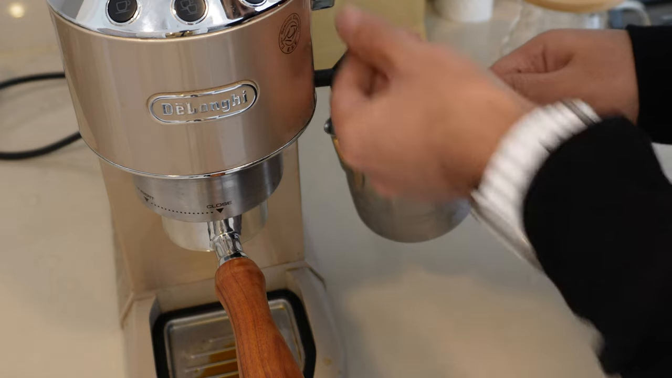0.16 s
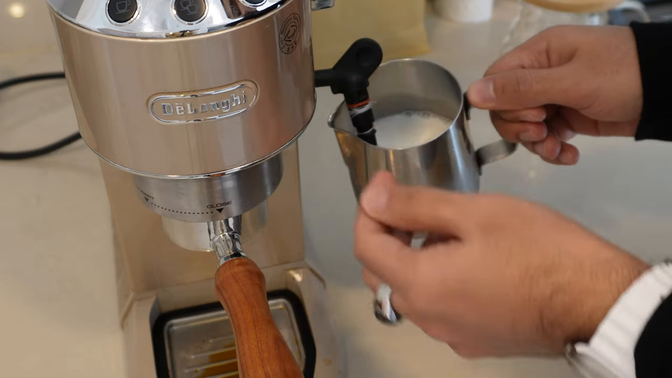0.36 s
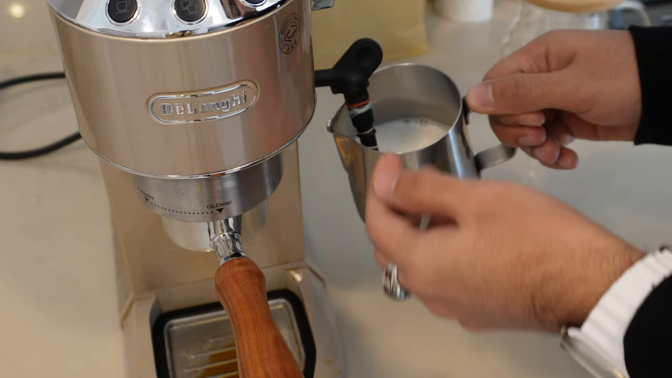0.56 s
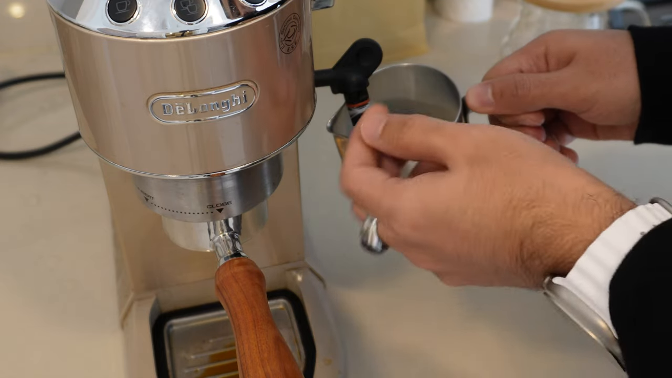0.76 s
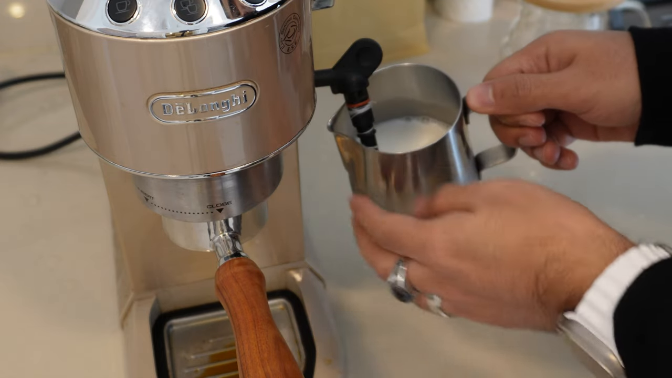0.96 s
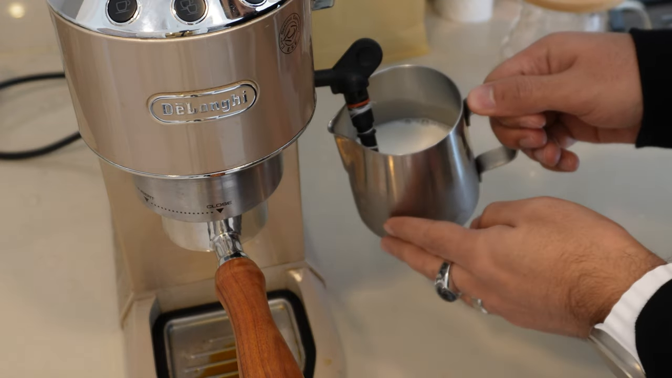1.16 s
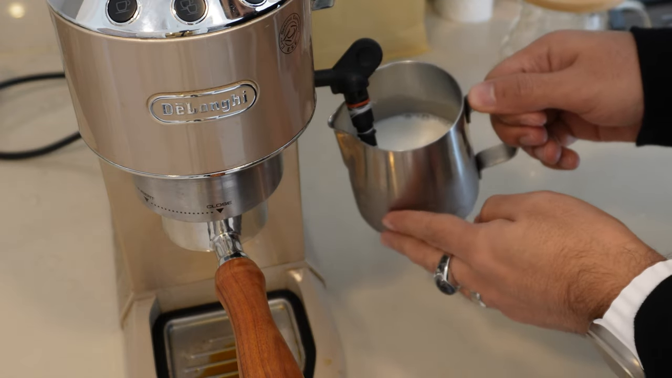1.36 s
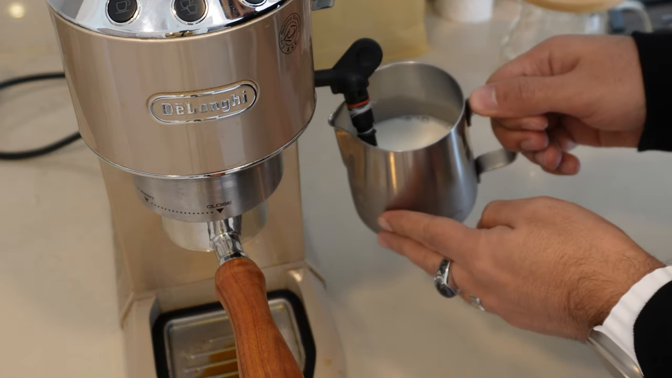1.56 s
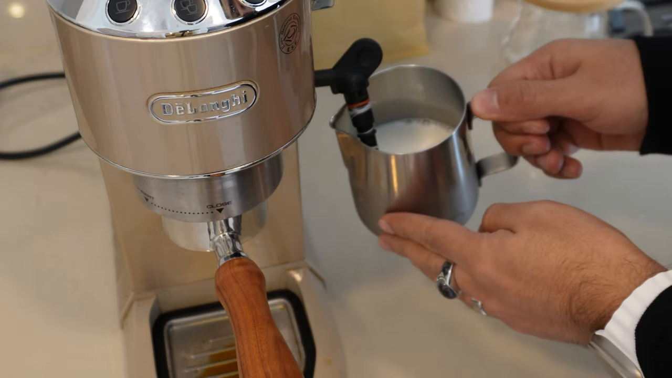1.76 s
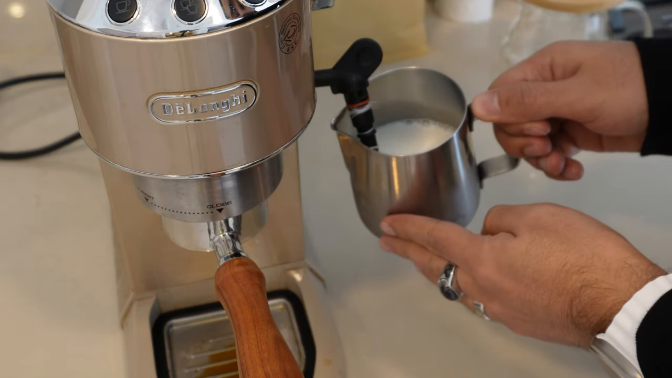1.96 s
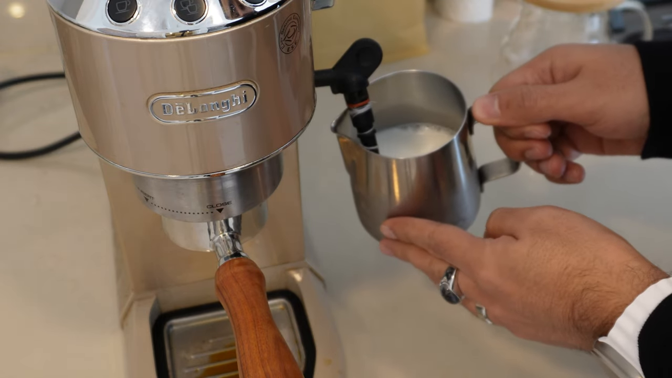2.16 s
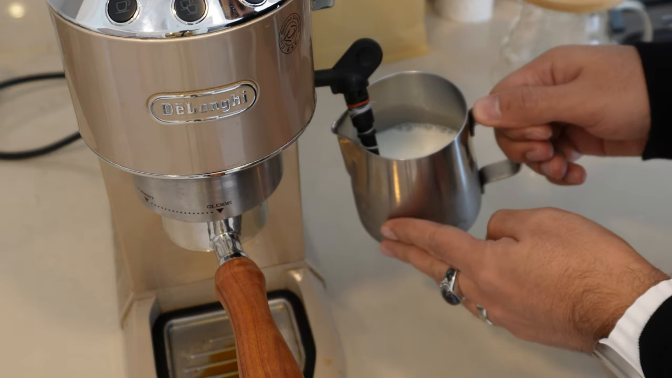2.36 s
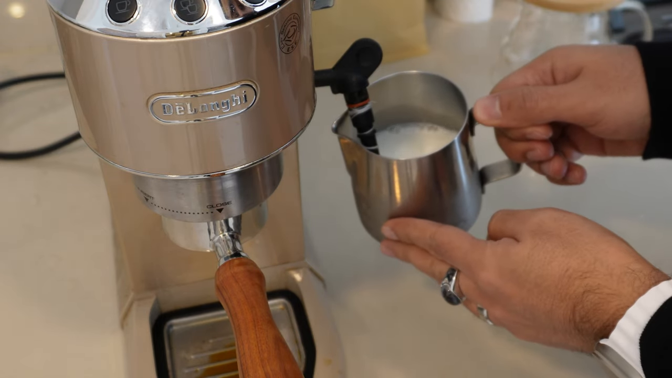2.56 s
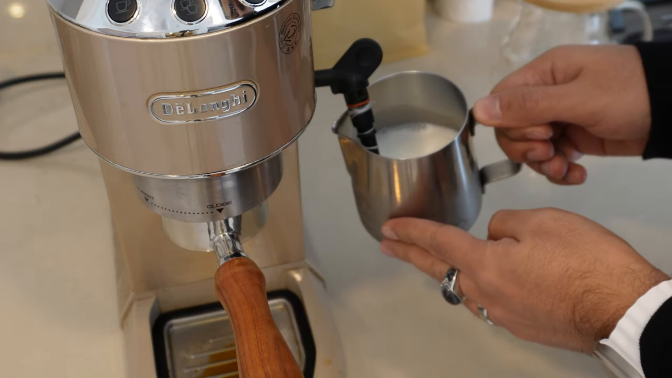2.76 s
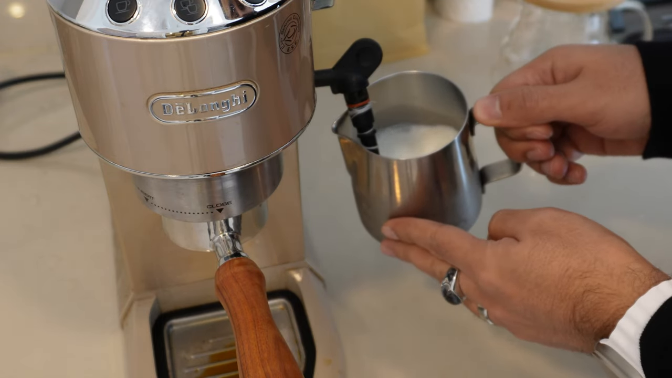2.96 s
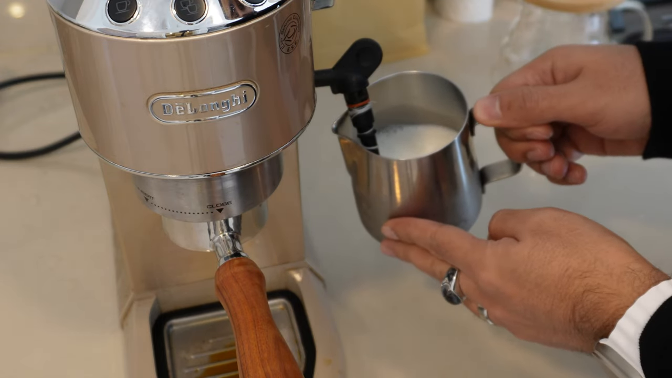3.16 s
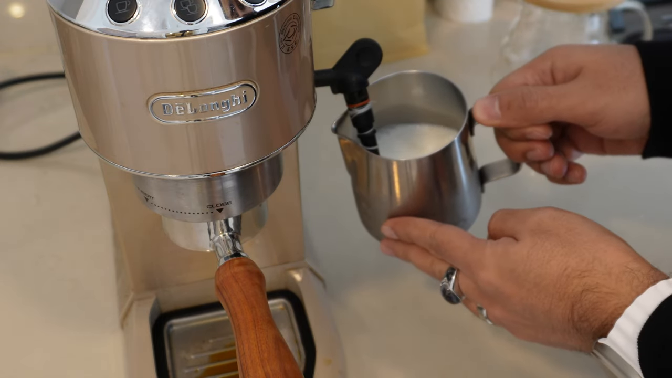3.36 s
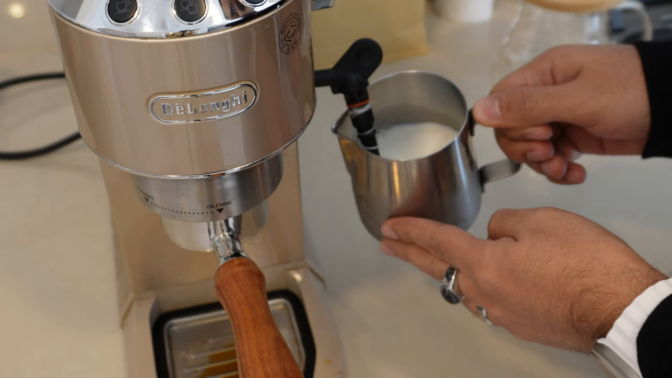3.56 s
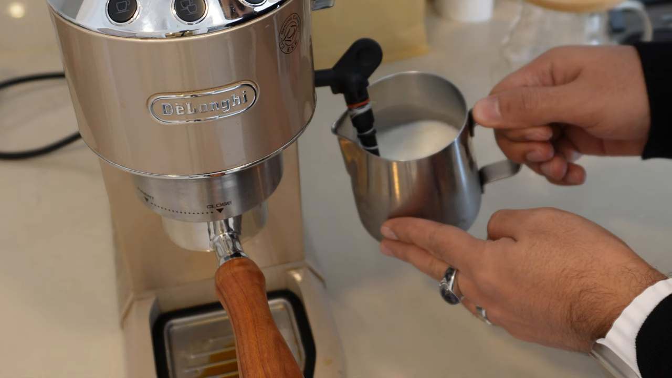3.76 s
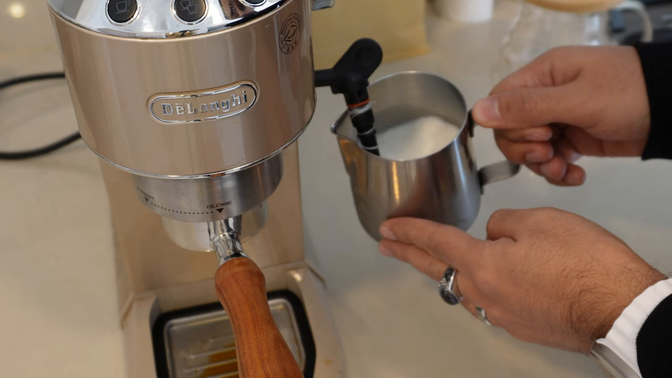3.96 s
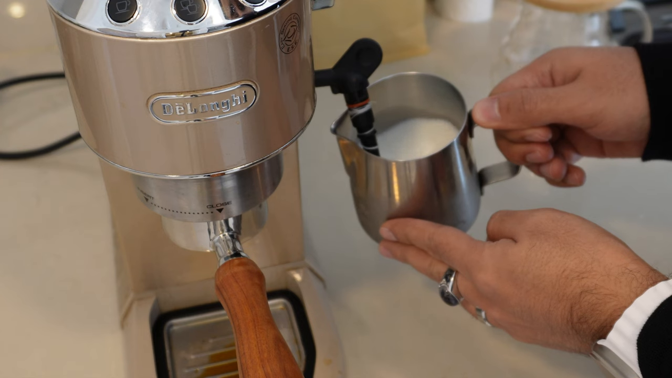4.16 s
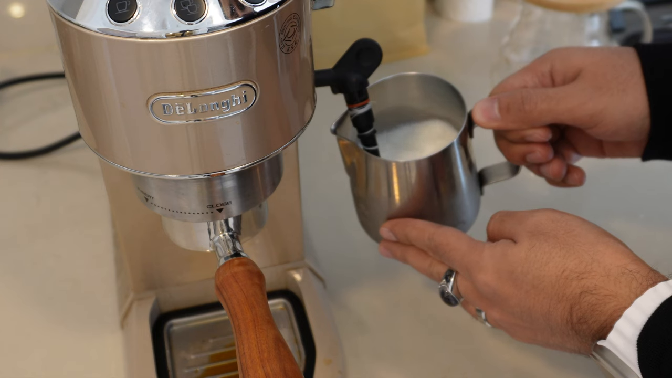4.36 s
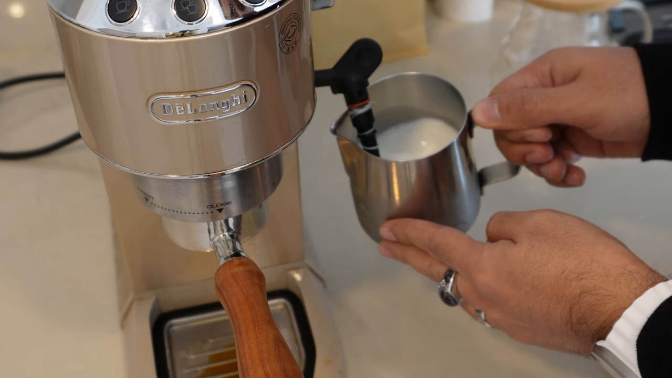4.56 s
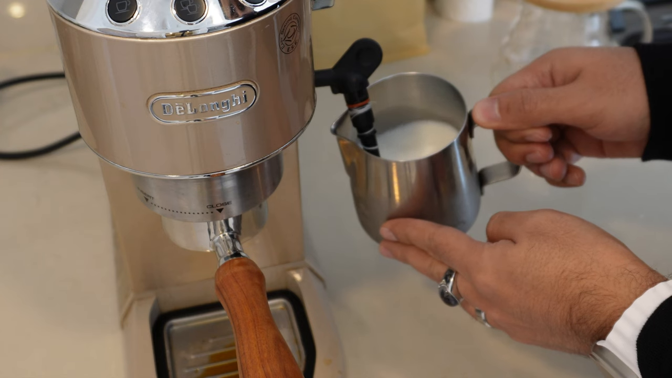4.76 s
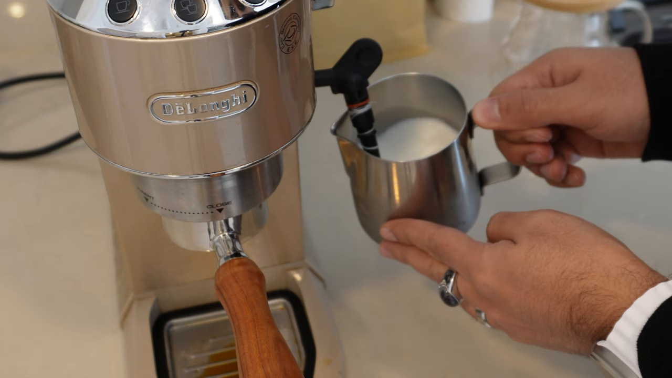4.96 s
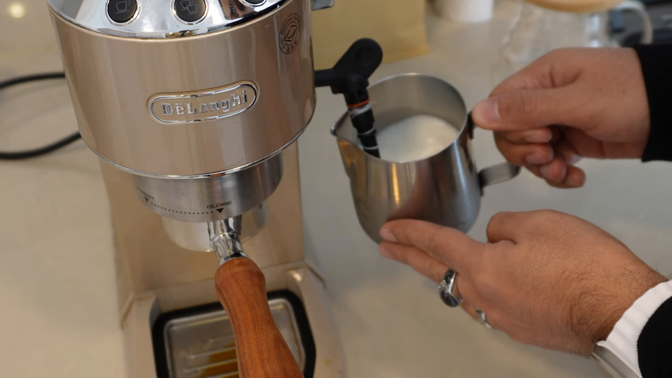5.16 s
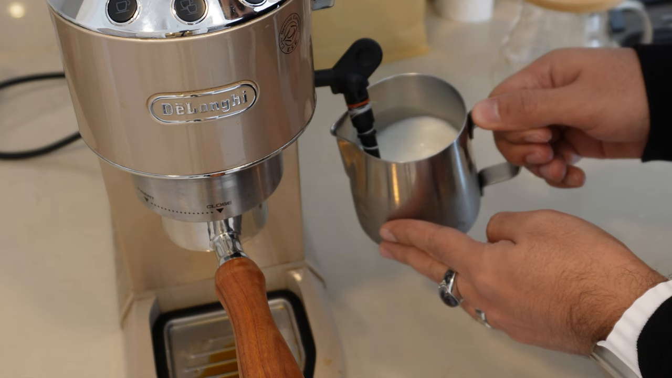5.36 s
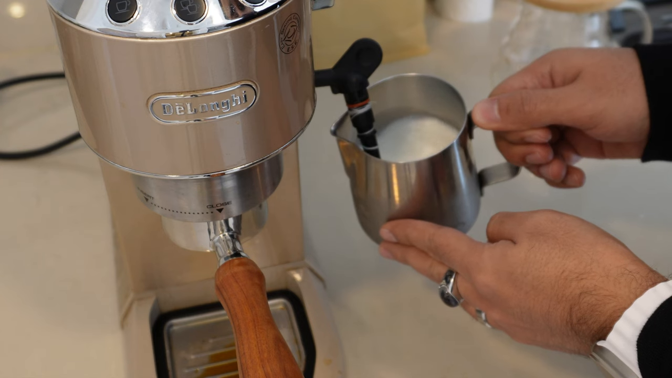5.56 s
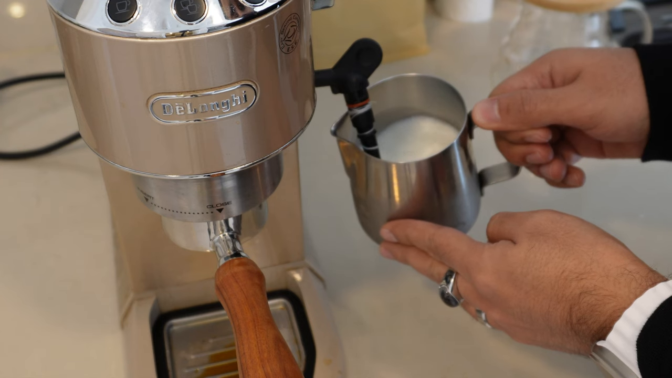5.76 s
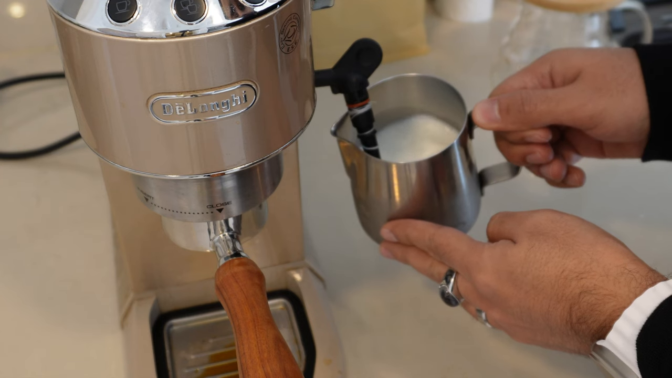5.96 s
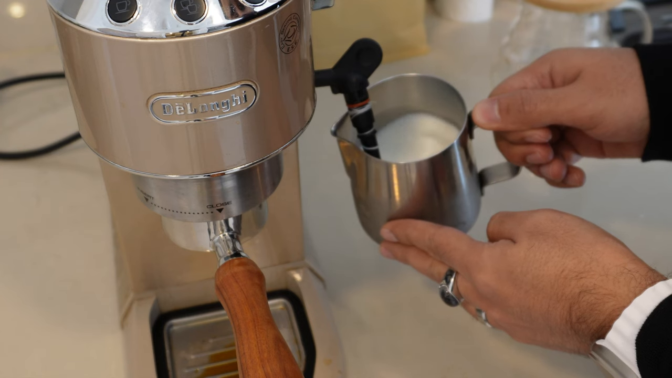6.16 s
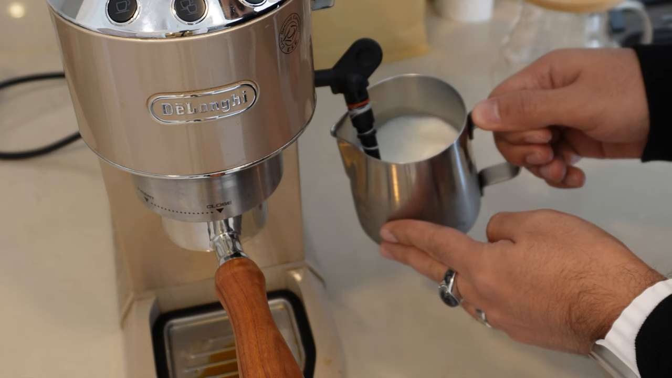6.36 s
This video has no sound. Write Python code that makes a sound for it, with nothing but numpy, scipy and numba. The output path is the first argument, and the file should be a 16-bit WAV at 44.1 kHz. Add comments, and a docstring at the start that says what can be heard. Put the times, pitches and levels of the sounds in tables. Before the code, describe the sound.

At the very start a coffee machine knob clicks with a sharp metallic clink, and a steel pitcher taps lightly against the steam wand twice within the first half second. A faint kitchen rumble and hum fill the short pause. At about 1 second the wand spits several crackling spurts of water, and steam enters the milk with a rising gurgle. From 1.2 seconds a loud, fizzing hiss runs on, with a metallic colour from the pitcher and a wavering high tone; higher gurgles rise through it until about 2.3 seconds. From around 4 seconds the tone sharpens into repeated short squeals, and a thin whistle joins at about 5.3 seconds. Underneath, the pump gives a soft, brief buzz once a second, like a regular tick. The steaming continues to the end at about 6.4 seconds, close to the microphone with slight room reverberation.

```python
"""Frothing milk with a steam wand

A steel pitcher on a kitchen counter, close to a mono microphone. The knob clicks, the pitcher taps the
wand, and steam spurts in with a rising gurgle. Collapsing steam bubbles excite the modes of the pitcher
wall and the froth, while the steam pocket at the tip resonates and squeals. The pump buzzes each second."""
import sys
import numpy as np
from scipy import signal
from scipy.fft import rfft, irfft
from scipy.io import wavfile
from scipy.ndimage import uniform_filter1d, minimum_filter1d
from numba import njit

SR = 44100
rng = np.random.default_rng(int(sys.argv[2]) if len(sys.argv) > 2 else 0)


def dump(signal):
    """Clip the signal to [-1, 1] and save it as 16-bit WAV at the path in sys.argv[1]."""
    limited = np.clip(np.atleast_2d(signal).T, -1, 1)
    pcm = np.round(limited * 32767).astype(np.int16)
    wavfile.write(sys.argv[1], SR, pcm)


N = 283563
TIME = np.arange(N) / SR
MAINS_HZ = 50.23


def undb(db):
    """Amplitude ratio of a level in dB."""
    return 10 ** (np.asarray(db) / 20)


def unit(x):
    """Normalisation to an rms of 1."""
    return x / np.sqrt(np.mean(np.abs(x) ** 2))


def curves(table):
    """Linear interpolation in time: a gate that opens at the first row, then each column."""
    times, *columns = np.transpose(table)
    return [TIME >= times[0]] + [np.interp(TIME, times, column) for column in columns]


def hump(start, length, edge):
    """Squared trapezoidal envelope that rises and falls over edge seconds."""
    return np.clip(np.minimum(TIME - start, start + length - TIME) / edge + .5, 0, 1) ** 2


def walk(rate):
    """Random modulation: values held for 1 / rate seconds and smoothed twice; spread near 1."""
    hold = int(SR / rate)
    steps = np.repeat(rng.standard_normal(N // hold + 1), hold)
    return 1.34 * uniform_filter1d(uniform_filter1d(steps, hold), hold)[:N]


@njit
def one_pole(x, pole):
    """First-order complex recursion whose pole may move every sample."""
    z, out = 0j, np.empty(len(x), np.complex128)
    for i in range(len(x)):
        z = z * pole[i] + x[i]
        out[i] = z
    return out


def ring(x, hz, *widths):
    """Damped resonators in cascade at hz, one per bandwidth in Hz; complex, unit gain at the centre."""
    for width in widths:
        damping = np.pi * width / SR
        x = damping * one_pole(x + 0j, np.exp(2j * np.pi * hz / SR - damping) * np.ones(N))
    return x


def kitchen(rumble_db=-50.5, hum_db=-58):
    """Background noise: broadband room rumble and a wavering hum at twice the mains frequency."""
    # rumble spectrum: f/Hz, relative spectral density level/dB
    spectrum = [(20, -22), (40, -14.5), (70, -15.5), (130, -6.5), (170, -9), (230, -4), (330, -7),
                (400, -13.5), (600, -9.5), (850, -11.5), (1300, -20.5), (2500, -26), (5000, -32.5),
                (8000, -39), (15500, -53)]
    corner_hz, corner_db = np.transpose(spectrum)
    hz = np.maximum(np.fft.rfftfreq(N, 1 / SR), 1)
    shape = undb(np.interp(np.log(hz), np.log(corner_hz), corner_db))
    rumble = unit(irfft(rfft(rng.standard_normal(N)) * shape, N))
    hum = np.sin(4 * np.pi * MAINS_HZ * TIME + 0.61 * walk(4.8)) * undb(hum_db + 1.7 * walk(6))
    return rumble * undb(rumble_db + 0.4 * walk(4.6)) + hum


def room(x, t60_s=0.3, tail_db=-8):
    """Reverberation: reflections from tiles and cupboards form a dense, exponentially decaying tail."""
    t = np.arange(SR // 2) / SR
    tail = rng.standard_normal(len(t)) * undb(-60 * t / t60_s) * (t > .004)
    tail = signal.lfilter([.6], [1, -.4], tail)
    return x + undb(tail_db) * signal.fftconvolve(x, tail / np.linalg.norm(tail))[:N]


def pump(rise_db_per_s=14.0):
    """Forced vibration: a piston hits both ends each mains cycle, harder as the pressure builds."""
    # pump runs: t/s, duration/s, final level/dB
    runs = [(1.015, 0.12, -41), (2.03, 0.086, -44), (3.025, 0.086, -46.5), (4.018, 0.1, -45.5),
            (5.021, 0.1, -43), (6.023, 0.094, -43)]
    # housing modes: f/Hz, bandwidth/Hz, relative level/dB
    modes = [(55, 55, -13.5), (103.5, 10, -10), (213, 25, -2.5), (323, 49, -5.5), (435, 106, -4),
             (730, 410, -4), (1510, 490, -4)]
    envelope = 0
    for start, length, db in runs:
        gate = np.clip(np.minimum((TIME - start) / 0.015, (start + length - TIME) / 0.02 + 1), 0, 1)
        envelope += gate * undb(db + rise_db_per_s * np.clip(TIME - start - length, -length, 0))
    cycles = MAINS_HZ * TIME
    strokes = np.exp(-(cycles % 1) / 0.022) + 0.33 * np.exp(-((cycles + 0.467) % 1) / 0.045)
    force = strokes - strokes.mean() + 0.59 * rng.standard_normal(N) * (1 + 4.8 * strokes)
    housing = sum((-1) ** k * undb(db) * unit(ring(force, hz, width).real)
                  for k, (hz, width, db) in enumerate(modes))
    return envelope * unit(housing)


def knocks():
    """Impact excitation: each blow gives a noisy crack, then the steel modes decay freely."""
    # knob click and taps of pitcher on wand: t/s, crack drive level/dB, crack f/Hz, crack decay time/s,
    # most strongly excited f/Hz, ring level/dB, factor of damping by the hand
    blows = [(.001, -37, 3930, 0.033, 1340, -41, 0.83), (.024, -28, 4500, 0.0069, 1400, -27, 1.2),
             (0.026, -19, 6060, 0.0043, 3790, -21, 1.24), (0.238, -31.5, 4500, .005, 1360, -36, 3.1),
             (.254, -34, 4550, 0.0025, 4950, -44, .8), (0.3777, -33.5, 4000, 0.0064, 1400, -34, 2.8),
             (0.383, -33.5, 3000, 0.0046, 2860, -34.5, 1.3)]
    # modes of the steel parts: f/Hz, relative level/dB, T60/s at a damping factor of 1
    modes = [(936, -1, 0.18), (1276, -3.5, 0.12), (1313, 4, 0.076), (2900, 1.5, 0.067), (3040, -16, .25),
             (3664, 0.5, 0.065), (3800, -8, 0.11), (4710, 0, 0.059), (5000, -10, 0.099), (5800, -13, .18),
             (6360, -10, 0.12), (7450, -16, 0.13)]
    out = np.zeros(N)
    for start, crack_db, crack_hz, decay, ring_hz, ring_db, damping in blows:
        age = np.maximum(TIME - start, 0)
        crack = rng.standard_normal(N) * np.minimum(age / 0.00081, 1) * np.exp(-age / decay)
        out += 3.56 * undb(crack_db) * ring(crack, crack_hz, 2600, 3500, 4100).real
        attack = np.minimum(age / 0.00055, 1)
        for hz, mode_db, t60 in modes:
            off_centre_db = -50 * min(abs(np.log2(hz / ring_hz)), .3)
            rattle_db = 3.2 * walk(122.2)
            level_db = ring_db + mode_db + off_centre_db + rattle_db - 60 * damping * age / t60
            out += attack * undb(level_db) * np.sin(2 * np.pi * hz * age)
    return out


def spurts():
    """Transient noise: slugs of water crack out of the tip before the steam runs dry."""
    # water slugs: t/s, drive level/dB, decay time/s, centre f/Hz
    slugs = [(1.031, -34.5, 0.026, 3500), (1.05, -22, 0.0079, 4530), (1.052, -19, 0.017, 1330),
             (1.09, -18.5, 0.0053, 4400), (1.097, -27, 0.0071, 3500), (1.127, -18, 0.0058, 3930),
             (1.155, -31, 0.008, 4940), (1.158, -19.5, 0.013, 1250), (1.175, -25, 0.0047, 4870),
             (1.2, -22, 0.005, 4820)]
    out = 0
    for start, db, decay, hz in slugs:
        age = TIME - start
        burst = rng.standard_normal(N) * np.clip(age / 0.0022, 0, 1) * np.exp(-np.abs(age) / decay)
        core = ring(burst, hz, 0.32 * hz, 0.94 * hz)
        spray = ring(ring(burst, 2700, 4200), 3100, 6400)
        out += undb(db) * (4.5 * core + 0.8 * spray).real
    return out


def gurgle():
    """Cavity resonance: big bubbles burst in an air hole whose pitch rises as it shrinks."""
    # holes closing round the jet: t/s, duration/s, initial f/Hz, limiting f/Hz, time constant/s, level/dB
    cavities = [(1.032, 0.066, 272, 420, 0.05, -42), (1.13, .1, 564, 782, 0.045, -39),
                (1.23, 0.116, 760, 1000, .1, -55), (1.43, .43, 3150, 3820, 0.061, -29),
                (1.92, .42, 2130, 3050, 0.24, -35)]
    pops = rng.standard_normal(N) * undb(3.4 * walk(70))
    out = 0
    for start, length, first_hz, last_hz, closing, db in cavities:
        hz = last_hz + (first_hz - last_hz) * np.exp(-np.maximum(TIME - start, 0) / closing)
        width = 47 + 0.048 * hz
        cavity = unit(ring(pops, hz, width, 2 * width).real)
        out += undb(db) * hump(start, length, edge=0.18 * length) * cavity
    return out


def whistle(start_s=5.3, centre_hz=3650, width_hz=64, level_db=-36):
    """Narrow-band resonance: turbulence drives a thin, wandering whistle that joins late."""
    hz = centre_hz * (1 + 0.0064 * walk(20))
    tone = unit(ring(rng.standard_normal(N), hz, width_hz, 2.2 * width_hz).real)
    return hump(start_s, N / SR, edge=0.23) * undb(level_db + 2.7 * walk(12)) * tone


def pitcher(x):
    """Destructive interference: echoes inside the pitcher cut notches in the spectrum of the steam."""
    # notches: f/Hz, bandwidth/Hz, depth (0 to 1)
    notches = [(2583, 66, 0.8), (5500, 130, 0.3), (7390, 160, 0.5), (3950, 84, 0.18), (13800, 150, 0.5)]
    for hz, width, depth in notches:
        x = x - 2 * depth * ring(x, hz, width).real
    return x


def bubble_modes(collapses, envelope, modes, flicker_db):
    """Modal superposition: each mode is struck by its own bubbles and drifts and flickers alone."""
    out = 0
    for centre_hz, width, db in modes:
        hz = centre_hz * (1 + 0.0065 * walk(2.53))
        drive = envelope * np.roll(collapses, rng.integers(N))
        out += undb(db + flicker_db * walk(14)) * unit(ring(drive, hz, width, 5 * width).real)
    return unit(out)


def jet(bubbles_per_s=8000, froth_start_hz=11250, sag_hz_per_s=200):
    """Bubble collapse: steam bubbles snap shut in cold milk and excite the pitcher wall and the froth."""
    # resonances, each table: f/Hz, bandwidth/Hz, relative level/dB
    low_wall = [(749, 81, -16), (1083, 96, -5), (1253, 72, -2.5), (1320, 66, 0.5), (1633, 86, -3.5),
                (1873, 210, -4.5), (2219, 140, 1), (2527, 77, 1), (2860, 170, 3)]
    mid_wall = [(3662, 123, 2), (3808, 154, 0), (4110, 330, -1.5), (4130, 420, -3.5)]
    high_wall = [(4515, 290, -4.5), (4869, 146, 1), (5134, 200, 0), (5610, 440, -2.5)]
    small_bubbles = [(7300, 630, 2.5), (7850, 580, -4)]
    fine_bubbles = [(8570, 400, -7.5), (8610, 340, 1), (9000, 460, -1)]
    froth_hiss = [(10000, 700, -6), (11550, 1500, 0.5), (12200, 2100, -2), (13100, 300, -3.5),
                  (14300, 1300, -2.5), (15600, 640, -2.5)]
    swirl_modes = [(7900, 160, 2), (9280, 170, -4), (10360, 170, 1), (11500, 200, -4), (12700, 220, -8),
                   (14100, 250, -9)]
    # vibration of the wall: t/s, level/dB of the low, mid and high modes
    wall_levels = [(1.12, -37, -25.5, -20), (1.33, -32, -32.5, -24.5), (1.44, -37.5, -38, -27.5),
                   (1.52, -36, -33, -24.5), (1.95, -33.5, -28.5, -24), (2.25, -37, -28.5, -25.5),
                   (2.45, -36, -33, -23.5), (2.6, -40, -31, -26), (3.2, -38.5, -29.5, -24),
                   (3.4, -40.5, -36.5, -31), (3.7, -48, -29.5, -36.5), (3.95, -44.5, -29, -35.5),
                   (4.2, -42.5, -34, -41), (4.55, -41, -36.5, -34), (5.1, -42.5, -35, -37),
                   (5.27, -47.5, -35.5, -36.5), (6.05, -45.5, -37, -34), (6.43, -49, -37, -38.5)]
    # treble hiss: t/s, level/dB of the small bubbles, fine bubbles and froth
    treble_levels = [(1.12, -42, -52, -50), (1.22, -33, -44, -39.5), (1.36, -33, -39, -32),
                     (1.5, -37.5, -49, -35.5), (1.9, -34.5, -42, -40.5), (2.25, -34, -41, -44),
                     (2.5, -39.5, -47.5, -46.5), (3.17, -33.5, -43, -43.5), (3.4, -41.5, -45, -44),
                     (3.75, -41, -41, -37.5), (4.0, -38, -42.5, -40.5), (4.25, -40, -45.5, -43.5),
                     (4.58, -41, -45, -37.5), (4.84, -42, -45, -40.5), (5.15, -41, -36, -37.5),
                     (5.35, -42, -43, -42), (5.7, -44, -38.5, -37), (6.43, -42, -39.5, -39.5)]
    _, low_db, mid_db, high_db = curves(wall_levels)
    _, small_db, fine_db, froth_db = curves(treble_levels)

    snaps = (rng.random(N) < bubbles_per_s / SR) * rng.standard_normal(N)
    snaps *= undb(0.51 * rng.exponential(size=N))
    collapses = unit(snaps) + 1.42 * rng.standard_normal(N)
    surge = undb(0.56 * walk(20) + 0.86 * walk(90))
    sizzle = surge * undb(0.43 * walk(60) + 0.86 * walk(200))
    # the froth resonance sinks as the foam thickens
    froth_hz = (froth_start_hz - sag_hz_per_s * TIME) * (1 + .01 * walk(12))
    froth = bubble_modes(collapses, sizzle, [(froth_hz, 750, 0)], flicker_db=2.6)
    froth += undb(-3.5) * bubble_modes(collapses, sizzle, froth_hiss, flicker_db=1.7)
    # narrow resonances wander as the milk swirls
    wandering = [(hz * (1 + .025 * walk(4)), width, db) for hz, width, db in swirl_modes]
    swirl = bubble_modes(collapses, surge, wandering, flicker_db=4.7)
    wall = (undb(low_db) * bubble_modes(collapses, surge, low_wall, flicker_db=1.6)
            + undb(mid_db) * bubble_modes(collapses, surge, mid_wall, flicker_db=2.3)
            + undb(high_db) * bubble_modes(collapses, surge, high_wall, flicker_db=2.0))
    fizz = (undb(small_db) * bubble_modes(collapses, sizzle, small_bubbles, flicker_db=2.5)
            + undb(fine_db) * bubble_modes(collapses, sizzle, fine_bubbles, flicker_db=2.1))
    return wall + fizz + undb(froth_db) * (unit(froth) + undb(-9) * swirl)


def steam_pocket():
    """Driven oscillator: turbulence excites the pocket at the tip; its lopsided swing adds an overtone."""
    # partials of the pocket: t/s, fundamental f/Hz, its level/dB, overtone f/Hz, its level/dB
    partials = [(1.15, 3140, -38, 6980, -30), (1.36, 3000, -30, 6560, -32.5), (1.42, 3250, -31, 6400, -30),
                (1.48, 3050, -31, 6450, -31.5), (1.6, 3060, -31, 6670, -36.5), (2.0, 3130, -29, 6570, -33),
                (2.3, 3070, -30, 6650, -30.5), (2.58, 3080, -27.5, 6100, -27),
                (3.18, 3086, -30, 6160, -30.5), (3.37, 3150, -25.5, 6320, -24),
                (3.63, 3220, -28.5, 6520, -28), (3.78, 3230, -28.5, 6700, -27),
                (4.0, 3300, -25.5, 6650, -26), (4.2, 3287, -25.5, 6460, -27.5),
                (4.45, 3232, -28, 6500, -23.5), (4.95, 3200, -26, 6510, -24.5),
                (5.15, 3280, -26.5, 6700, -29), (5.35, 3305, -26.5, 6610, -27),
                (6.2, 3324, -27.5, 6720, -29.5), (6.43, 3300, -29, 6650, -29.5)]
    # the resonance sharpens as the milk warms: t/s, bandwidth/Hz
    bandwidths = [(1.15, 252), (3.2, 220), (4.0, 119), (5.1, 103), (5.3, 111), (6.43, 110)]
    # bursts of clear squealing: t/s, duration/s, level/dB
    squeals = [(1.407, 0.035, -25), (3.926, 0.026, -35), (4.01, .16, -28.5), (4.188, 0.17, -26),
               (4.394, .079, -30.5), (4.503, 0.2, -30.5), (4.728, 0.053, -27.5), (4.898, .044, -27),
               (5.218, 0.087, -24.5), (5.338, 0.11, -28.5), (5.472, 0.062, -26), (5.62, 0.24, -29),
               (5.884, .081, -29), (5.981, 0.2, -26.5), (6.219, 0.041, -29), (6.32, .04, -30)]
    on, hz, fundamental_db, overtone_hz, overtone_db = curves(partials)
    _, width = curves(bandwidths)
    hz *= 1 + 0.0069 * walk(60) + 0.0046 * walk(15)
    overtone_hz *= 1 + 0.016 * walk(15)
    swing = ring(rng.standard_normal(N), hz, width)
    swing = ring(swing, 1.044 * hz, 6.5 * width)
    swing = unit(ring(swing, 0.986 * hz, 4.9 * width))
    # the overtone swells with the swing but is blurred by its own turbulence
    turbulence = unit(ring(rng.standard_normal(N), overtone_hz, 790))
    overtone = unit(ring(turbulence * (1.4 + np.abs(swing)), overtone_hz, 980).real)
    bursts = sum(undb(db) * hump(start, length, edge=0.012) for start, length, db in squeals)
    fundamental = (undb(fundamental_db) + bursts) * undb(0.9 * walk(24.78)) * unit(swing.real)
    return on * (fundamental + undb(overtone_db + 0.49 * walk(12)) * overtone)


def scene():
    """Superposition of all sources in two equal channels; the background sinks as the steam starts."""
    # steam flow, choking twice on water before it runs steadily: t/s, level/dB
    flow = [(1.12, -37), (1.13, -2.5), (1.148, -17), (1.16, -1.5), (1.178, -4.5), (1.19, -14), (1.205, -2),
            (1.25, 0)]
    on, flow_db = curves(flow)
    steam = on * undb(flow_db) * (jet() + steam_pocket() + whistle())
    frothing = pitcher(steam) + spurts() + gurgle()
    duck_db = np.interp(TIME, [1.1, 1.4], [0, -5.5])
    mono = room(knocks() + frothing + pump()) + undb(duck_db) * kitchen()
    return np.array([mono, mono])


def record(dry, ceiling=.35, cutoff_hz=15720):
    """Peak limiting with look-ahead, followed by a steep low-pass filter."""
    gain = np.minimum(ceiling / (np.abs(dry) + 1e-9), 1)
    gain = uniform_filter1d(minimum_filter1d(gain, size=257, axis=1), size=257, axis=1)
    return signal.sosfilt(signal.ellip(14, .2, 80, cutoff_hz, fs=SR, output="sos"), gain * dry)


dry = scene()
out = record(dry)
dump(out)
```